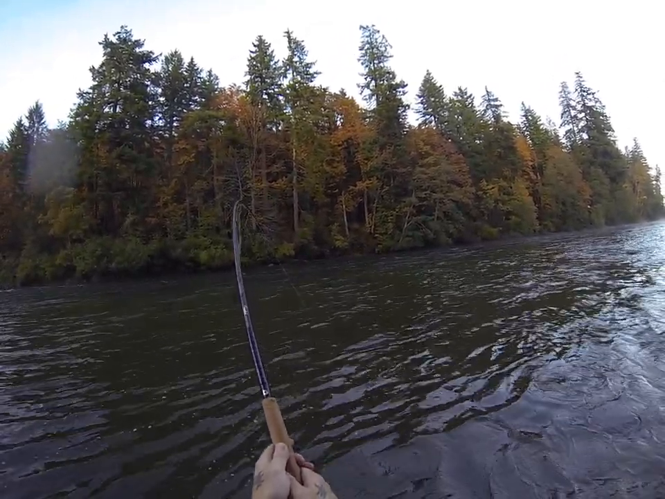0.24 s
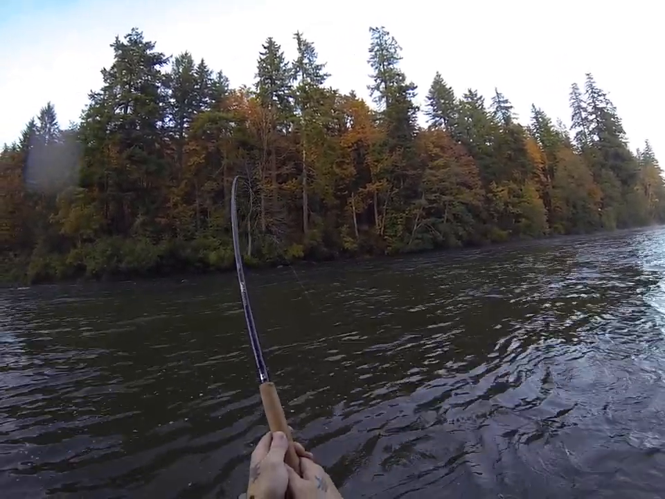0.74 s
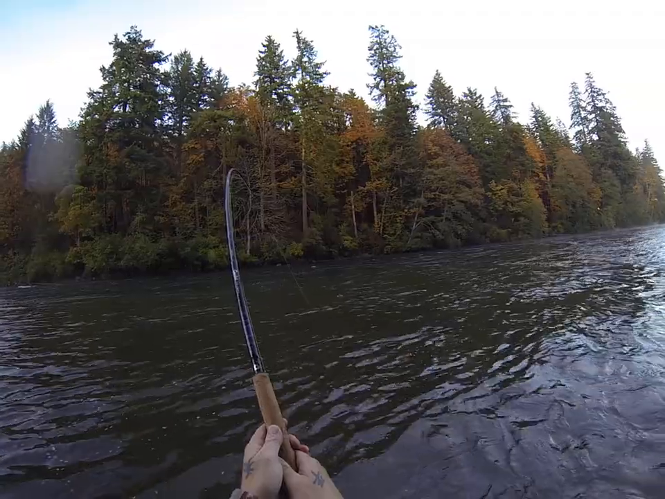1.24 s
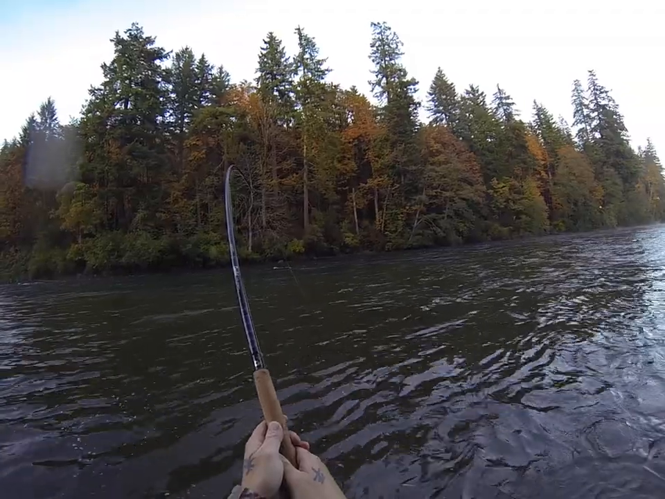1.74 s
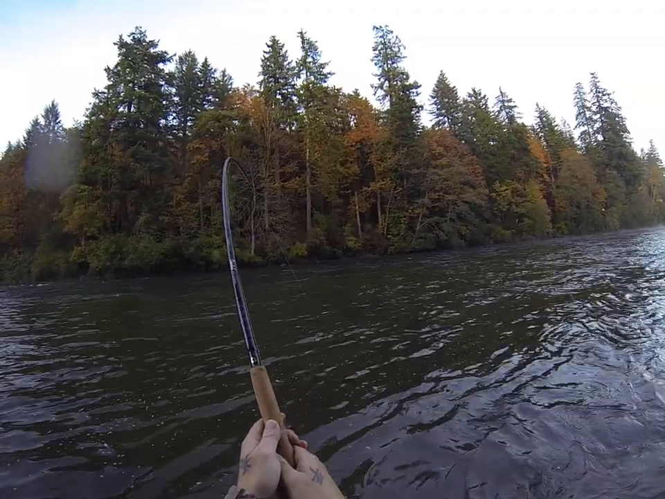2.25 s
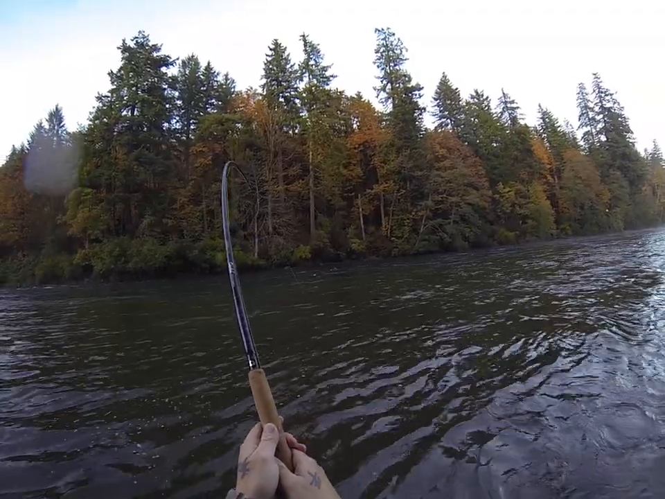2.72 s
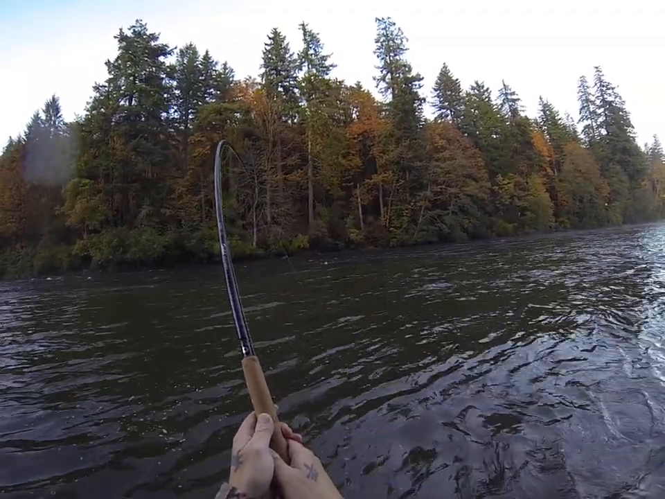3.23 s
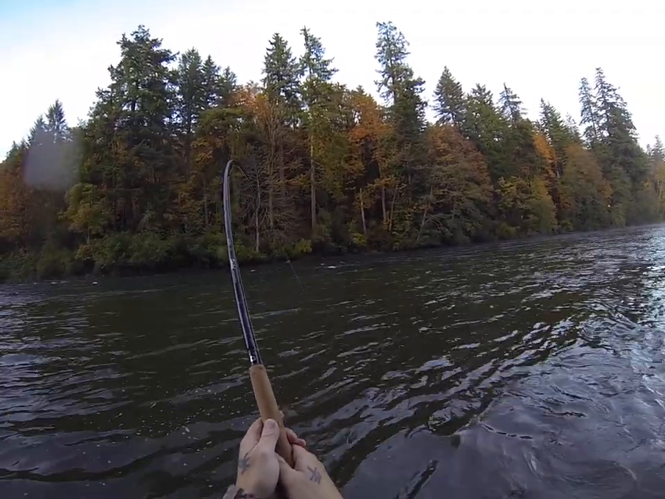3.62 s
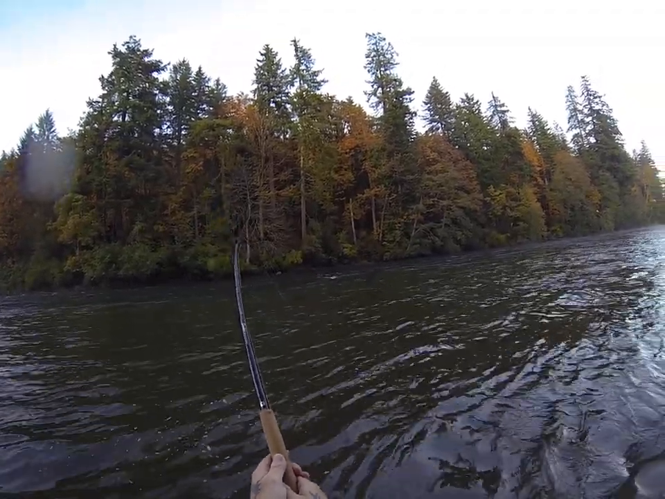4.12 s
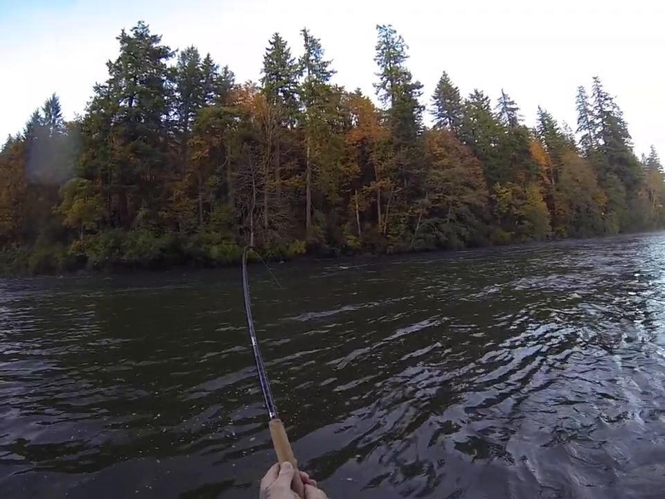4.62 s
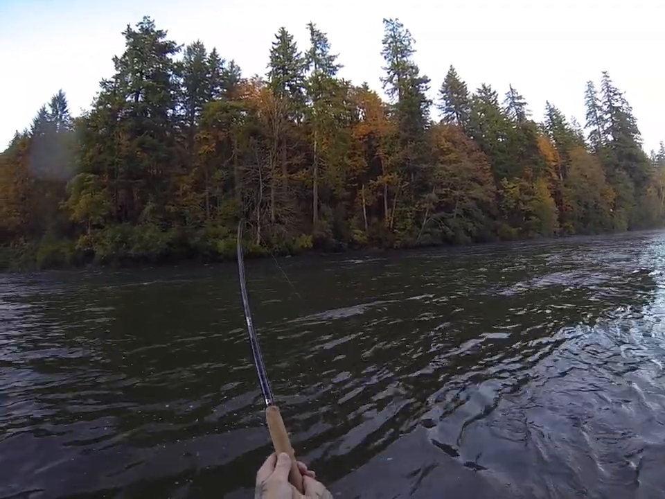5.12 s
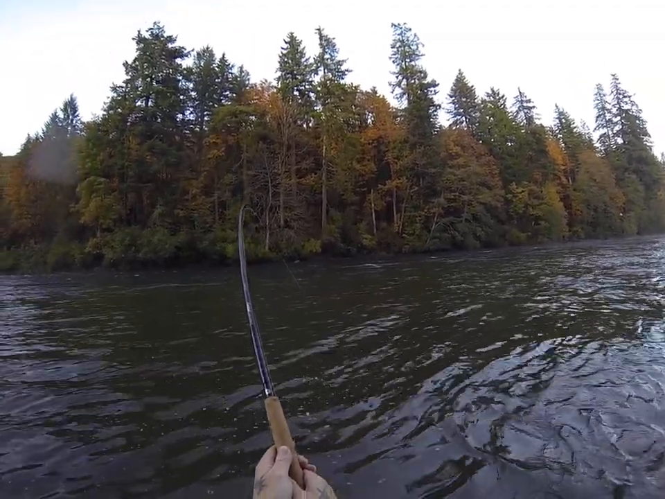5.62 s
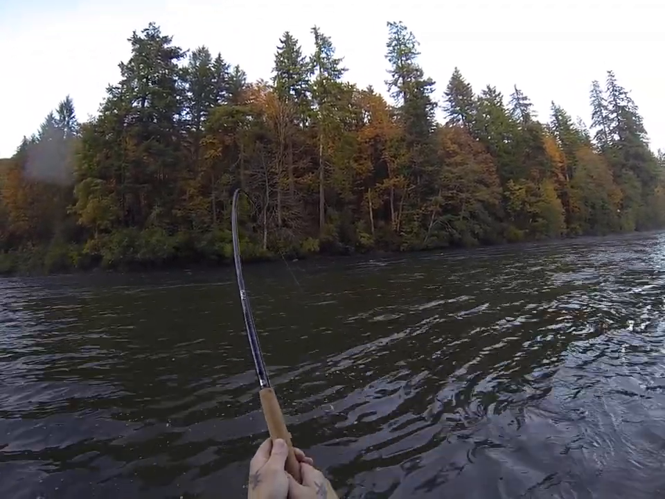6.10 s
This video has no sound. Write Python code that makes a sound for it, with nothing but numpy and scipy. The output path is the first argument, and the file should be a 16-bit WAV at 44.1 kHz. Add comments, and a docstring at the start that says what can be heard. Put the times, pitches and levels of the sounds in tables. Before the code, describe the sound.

A wide river rushes steadily, heard boxy and hollow through a closed camera case, with low rumbling buffets, small drips and a faint electronic whine.

```python
"""A wide, fast river heard from a body-worn camera in a closed case that rings near 1.5 kHz.
The rush is shaped noise; nearer ripples are crowds of decaying sine bubbles, strongest around 5 s.
Low noise swelling in timed buffets rumbles on the case; single drops and one dull knock stand out.
The camera's electronics whine faintly: a gated tone and its octave in rapid bursts, with fizz."""
import sys
import numpy as np
from scipy import signal
from scipy.fft import rfft, irfft
from scipy.io import wavfile
from scipy.ndimage import uniform_filter1d

SR = 44100
rng = np.random.default_rng(int(sys.argv[2]) if len(sys.argv) > 2 else 0)


def generate_wav(sig):
    """Save sig (samples, or channels by samples) to the path in sys.argv[1] as 16-bit PCM at SR."""
    pcm = np.round(np.clip(np.atleast_2d(sig).T, -1, 1) * 32767).astype(np.int16)
    wavfile.write(sys.argv[1], SR, pcm)


N = 280476

# far rush inside the case, relative spectrum: f/Hz, density/dB
RUSH_SPECTRUM = [(20, -10), (70, 4), (105, 2.5), (140, 0.5), (300, -5), (550, -6.5), (950, -7), (1100, -12),
                 (2600, -15.5), (4300, -19.5), (6500, -23), (8800, -28), (11200, -32), (13400, -29.5)]
# case resonances: f/Hz, width at half the dB lift/Hz, lift/dB
CASE_RESONANCES = [(1236, 148, 9.5), (1501.4, 352, 16.5), (1839, 438, 13.5), (2346, 310, 4.5),
                   (3034, 453, 8.5), (3322, 220, 5), (3686, 360, 6), (4800, 170, 4.5), (5200, 440, 3.5),
                   (7700, 500, 2.5), (9750, 610, 4), (11440, 1300, 2.5)]
# churn of the nearby water, relative: t/s, level/dB
CHURN_CURVE = [(0, 0), (.7, -0.7), (1.4, -0.2), (1.9, -1), (2.3, 0.5), (2.8, 0), (3.3, 0), (3.8, 0.8),
               (4.3, -0.1), (4.65, 2), (5.0, 2.5), (5.35, 1.5), (5.6, 1), (5.95, 0.5), (6.36, 0.5)]
# share of the churn dB that each pitch of the rush takes: f/Hz, share/1
CHURN_SHARE = [(100, 0), (800, 0.29), (1200, 0.87), (2300, 0.27), (4000, 1), (7000, 0.077), (13000, 0.31)]
# buffeting colour, relative: f/Hz, density/dB
RUMBLE_SPECTRUM = [(8, -15.5), (24, -9), (36, -0.5), (46, -3.5), (56, -14.5), (70, -48), (120, -55)]
# rustle colour, relative: f/Hz, density/dB
RUSTLE_SPECTRUM = [(40, -9.5), (70, 11.5), (87, -5.5), (103, 4), (122, -14.5), (400, -22), (1200, -47)]
# buffets that stand out, before the rumble gain: peak t/s, strength/dB
BUFFET_PEAKS = [(.165, -37), (.331, -30.5), (0.692, -29), (.917, -38), (1.059, -32), (1.155, -37),
                (1.428, -31), (1.648, -38), (1.743, -39), (1.811, -33.5), (2.043, -38), (2.172, -31.5),
                (2.568, -35.5), (2.663, -37), (2.783, -37), (3.323, -30), (3.688, -30), (3.936, -38),
                (4.06, -28.5), (4.144, -33), (4.237, -36), (4.437, -34.5), (4.8, -36), (5.191, -31),
                (5.423, -37.5), (5.489, -37.5), (5.561, -36.5), (5.702, -36.5), (5.931, -33.5),
                (6.181, -36), (6.296, -33)]
# single bubbles and drops close by: t/s, peak level/dB, f/Hz, t60/s, spray share of power/1
NEAR_DROPS = [(0.212, -55, 3600, .05, 0.9), (2.632, -58, 4950, .025, .85), (2.650, -61, 4970, .025, .85),
              (3.098, -48, 1680, 0.021, 0), (3.317, -51, 1174, 0.064, 0.14), (3.742, -42, 1540, 0.03, 0.1),
              (4.113, -48, 1400, 0.023, 0), (4.143, -49.5, 5000, 0.008, 0.4),
              (4.447, -44, 1503, 0.045, 0.3), (4.625, -52, 1230, 0.06, 0.2), (4.640, -61, 5030, .02, .6),
              (4.798, -65, 4030, .02, .6), (4.982, -61, 5670, .02, .6), (5.042, -48.5, 2250, 0.018, 0.4),
              (5.169, -63, 5000, .02, .6), (5.318, -56, 2250, .03, .3), (5.367, -50, 2140, .03, 0.45),
              (5.759, -60, 4970, .02, .6), (5.957, -42, 1530, 0.02, 0.3)]
# dull knock of a hard buffet: t/s, rms level before the decay/dB, t60/s
KNOCK_EVENT = (0.678, -47.5, 0.12)
# knock colour, relative: f/Hz, density/dB
KNOCK_SPECTRUM = [(50, -23), (95, 11), (200, -20), (450, -12), (700, -27), (1500, -56)]

BURSTS_HZ, WHINE_HZ, EDGE_HZ = 47.952, 6448.5, 13650
SWELL_S = 0.021  # from a buffet's peak to half its amplitude, either side
JOSTLE_DB = -43  # rms strength of the small random buffets, before the rumble gain
LUMPINESS = 1.45  # exponent; above 1, small buffets break up into puffs with lulls


def gain_of(db):
    """Decibels to amplitude."""
    return 10 ** (np.asarray(db) / 20)


def evened(x):
    """Scales to an rms of one."""
    return x / np.sqrt(np.mean(x ** 2) + 1e-20)


def read(points, hz):
    """Interpolates a spectrum table on a log-frequency axis."""
    f, value = np.transpose(points)
    return np.interp(np.log(hz + 1), np.log(f + 1), value)


def coloured(x, db_at):
    """Filters x by a function that gives dB for each frequency."""
    gain = gain_of(db_at(np.fft.rfftfreq(len(x), 1 / SR)))
    return irfft(rfft(x) * gain, len(x))


def add(mix, start_s, sound):
    """Mixes a sound in at start_s."""
    part = mix[round(start_s * SR):][:len(sound)]
    part += sound[:len(part)]


def water_db(hz):
    """Water spectrum plus the bell-shaped humps of the ringing case."""
    humps_db = sum(db * .5 ** ((2 * (hz - f) / width) ** 2) for f, width, db in CASE_RESONANCES)
    return read(RUSH_SPECTRUM, hz) + humps_db


def rush(level_db=-56.0, patchy_db=0.5, flicker_db=0.3):
    """Countless far splashes merge into a wash with small drifting patches."""
    window, hop = 512, 128  # samples
    hz = np.fft.rfftfreq(window, 1 / SR)
    t = np.arange(N // hop + 5) * hop / SR
    real, imag, patches = rng.standard_normal((3, len(t), len(hz)))
    patches = uniform_filter1d(patches, size=24, axis=0)
    patches = evened(uniform_filter1d(patches, size=7, axis=1))
    flicker = evened(uniform_filter1d(rng.standard_normal(len(t)), size=20))
    churn_db = np.interp(t, *np.transpose(CHURN_CURVE)) + flicker_db * flicker
    field_db = water_db(hz) + patchy_db * patches + churn_db[:, None] * read(CHURN_SHARE, hz)
    field = (real + 1j * imag) * gain_of(field_db)
    wash = signal.istft(field.T, nperseg=window, noverlap=window - hop)[1][:N]
    return gain_of(level_db) * evened(wash)


def bubble(hz, t60_s, rise=0.02):
    """A pocket of air rings, dies away and rises in pitch as it nears the surface."""
    t = np.arange(int(t60_s * SR) + 2) / SR
    onset = 1 - np.exp(-t * hz / 2)
    decay = gain_of(-60 * t / t60_s)
    return onset * decay * np.sin(2 * np.pi * hz * t * (1 + rise * t / t60_s))


def ripples(level_db=-66, per_s=500, spread_db=3.0, t60_cycles=22, churn_follow=1.9, pitches=36):
    """Small bubbles burst at random from the nearer ripples, louder as the water churns."""
    churn_db = np.interp(np.arange(N) / SR, *np.transpose(CHURN_CURVE))
    out = np.zeros(N)
    for hz in np.geomspace(1100, 8500, pitches):
        born = np.flatnonzero(rng.random(N) < per_s / pitches / SR)
        size_db = spread_db * np.minimum(rng.exponential(1, N)[born], 4)
        clicks = np.zeros(N)
        clicks[born] = gain_of(size_db + churn_follow * churn_db[born])
        out += hz * signal.oaconvolve(clicks, bubble(hz, t60_cycles / hz))[:N]
    return gain_of(level_db) * evened(coloured(out, water_db))


def buffeting(jostle):
    """Buffet strength in dB: bell-shaped swells over the small random buffets, summed as power."""
    t = np.arange(N) / SR
    power = (gain_of(JOSTLE_DB) * evened(jostle ** LUMPINESS)) ** 2
    for peak_s, db in BUFFET_PEAKS:
        swell = gain_of(db) * .5 ** (((t - peak_s) / SWELL_S) ** 2)
        power = power + swell ** 2
    return 10 * np.log10(power + 1e-12)


def rumble(gain_db=1.9, top_hz=60, rustle_db=-62.5, rustle_follow=0.33):
    """Each buffet shakes the case for a few slow cycles and brings a dull rustle with it."""
    shake = coloured(rng.standard_normal(N), lambda hz: read(RUMBLE_SPECTRUM, hz))
    envelope = np.sqrt(uniform_filter1d(abs(signal.hilbert(shake)) ** 2, size=500))
    buffet_db = buffeting(envelope)
    # flatten the noise's own swells, then impose the buffets
    throb = gain_of(gain_db + buffet_db) * shake / envelope
    lowpass = signal.butter(4, top_hz, fs=SR, output="sos")
    throb = signal.sosfiltfilt(lowpass, throb)
    rustle = coloured(rng.standard_normal(N), lambda hz: read(RUSTLE_SPECTRUM, hz))
    rustle = evened(rustle * gain_of(rustle_follow * buffet_db))
    return throb + gain_of(rustle_db) * rustle


def whine(tone_db=-73.5, octave_db=-70.5, duty=0.37, jitter_rad=0.99, limp_db=2.0, fizz_db=-82):
    """Electronics sing in regular bursts, the tone strong and weak by turns, fizz around each start."""
    t = np.arange(N) / SR
    burst, place = np.divmod(t * BURSTS_HZ, 1)
    gate = uniform_filter1d(1. * (place < duty), size=70)
    slip_rad = jitter_rad * rng.standard_normal(int(burst[-1]) + 1)[burst.astype(int)]
    angle = 2 * np.pi * WHINE_HZ * t + slip_rad
    tone = gain_of(tone_db + limp_db * np.cos(np.pi * burst)) * np.sin(angle)
    octave = gain_of(octave_db) * np.sin(2 * angle)
    fizz_spectrum = [(4000, -29), (6500, 15), (8000, 4), (13000, -3)]  # f/Hz, density/dB
    fizz = coloured(rng.standard_normal(N), lambda hz: read(fizz_spectrum, hz))
    switching = np.cos(np.pi * place) ** 10  # peaks at each burst start
    return np.sqrt(2) * gate * (tone + octave) + gain_of(fizz_db) * evened(fizz * switching)


def drops(spray_width=0.24):
    """Bubbles near enough to be heard singly: a ring mixed with decaying noise as fine spray."""
    out = np.zeros(N)
    for start_s, peak_db, hz, t60_s, spatter in NEAR_DROPS:
        ring = bubble(hz, t60_s)
        # -12 dB at spray_width (natural-log frequency) either side of the pitch
        spray = coloured(rng.standard_normal(8192),
                         lambda f: -12 * (np.log((f + 1) / hz) / spray_width) ** 2)
        spray = np.resize(spray, len(ring)) * gain_of(np.linspace(0, -60, len(ring)))
        share = np.clip(spatter, 0, 1)
        sound = np.sqrt(1 - share) * evened(ring) + np.sqrt(share) * evened(spray)
        add(out, start_s, gain_of(peak_db) * sound / abs(sound).max())
    return out


def knock(attack_s=.003):
    """A soft, quickly damped bump on the case: coloured noise with an exponential decay."""
    start_s, level_db, t60_s = KNOCK_EVENT
    t = np.arange(SR // 2) / SR
    body = evened(coloured(rng.standard_normal(len(t)), lambda hz: read(KNOCK_SPECTRUM, hz)))
    attack = np.minimum(t / attack_s, 1)
    out = np.zeros(N)
    add(out, start_s, body * gain_of(level_db - 60 * t / t60_s) * attack)
    return out


def scene():
    """Water, buffeting and electronics at one microphone."""
    return (rush() + ripples() + rumble() + whine() + drops() + knock())[None]


def record(dry):
    """The recorder's band limit: a linear-phase low-pass at EDGE_HZ."""
    lowpass = signal.firwin(255, EDGE_HZ, window=("kaiser", 8), fs=SR)
    return signal.oaconvolve(dry, lowpass[None], "same")


dry = scene()
out = record(dry)
generate_wav(out)
```